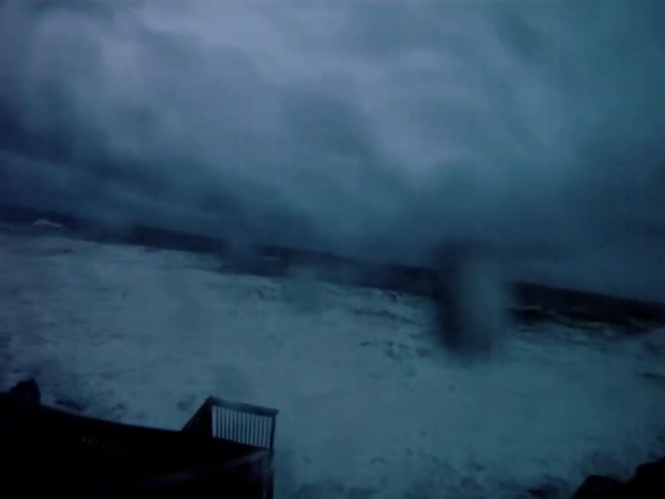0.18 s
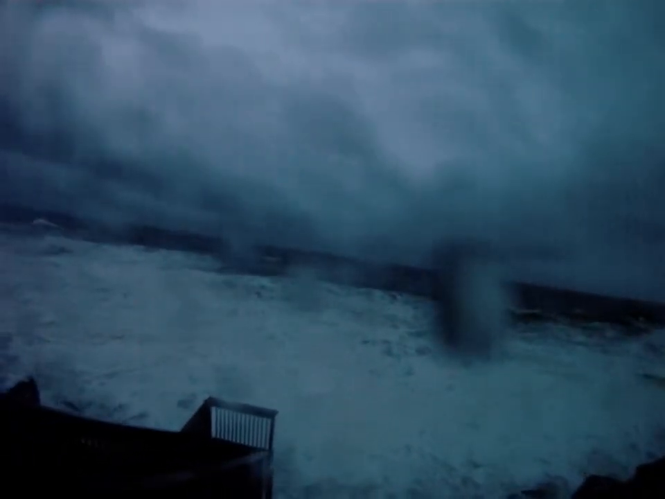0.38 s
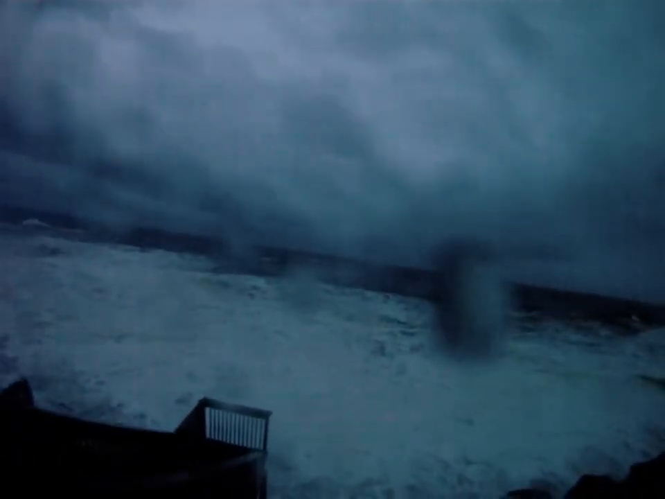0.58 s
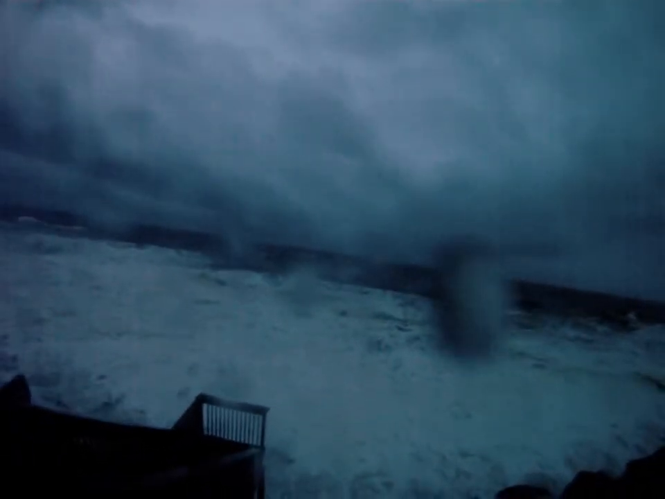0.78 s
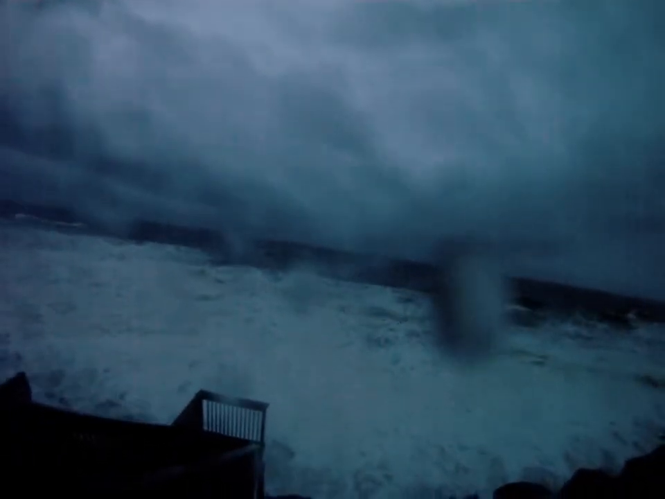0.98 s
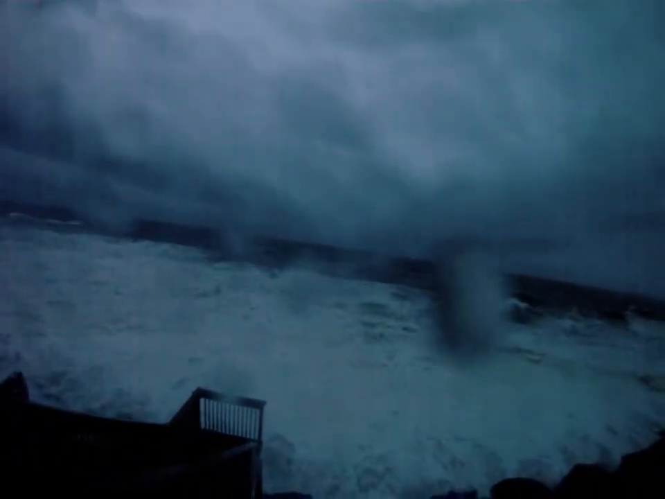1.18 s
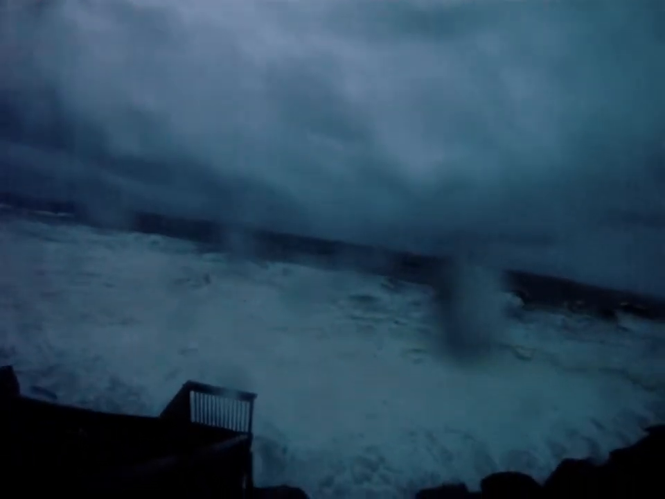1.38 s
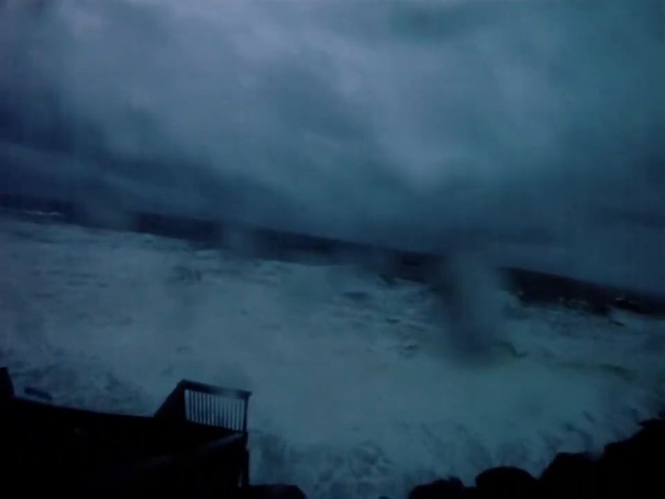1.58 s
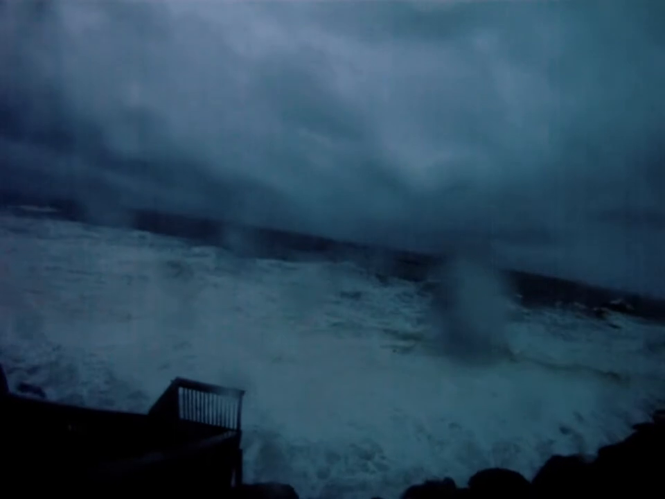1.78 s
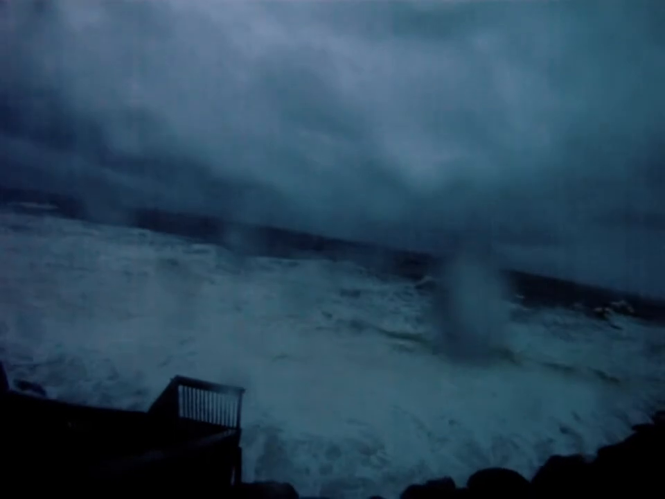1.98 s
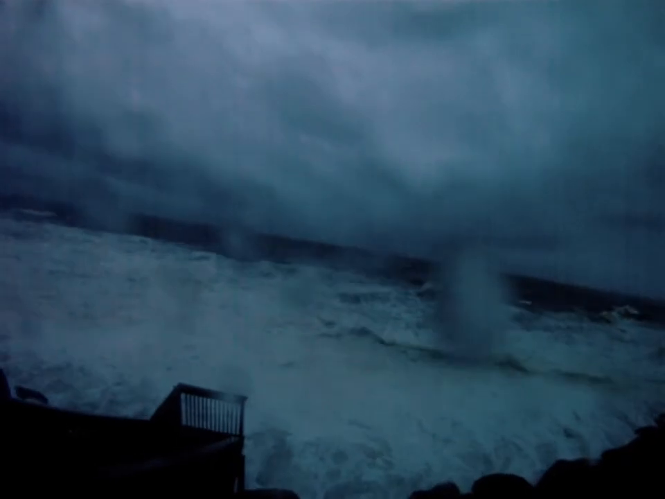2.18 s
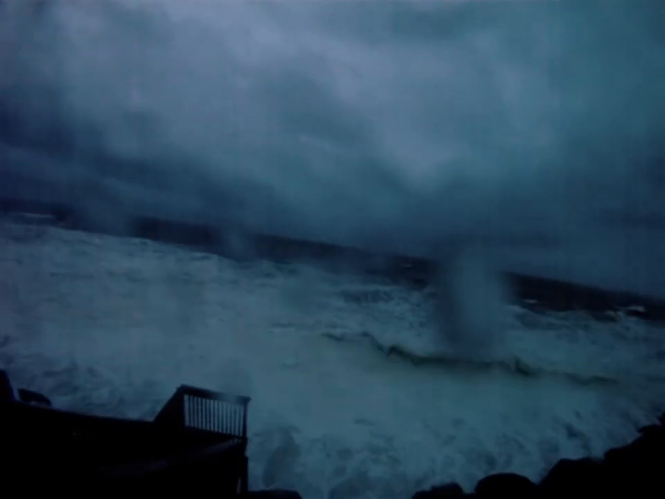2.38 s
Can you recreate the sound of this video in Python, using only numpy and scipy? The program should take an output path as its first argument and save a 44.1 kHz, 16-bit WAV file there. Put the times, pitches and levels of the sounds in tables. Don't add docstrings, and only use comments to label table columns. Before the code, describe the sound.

Storm surf roars without pause at a seawall, hollow and boxy through a sealed plastic housing. Hard drops tick early, then scattered lighter ones, while low wind rumble swells later; rough, dull mono sound.

```python
import sys
import numpy as np
from scipy import signal
from scipy.fft import rfft, irfft
from scipy.io import wavfile
from scipy.ndimage import uniform_filter1d, minimum_filter1d

SR = 44100
rng = np.random.default_rng(int(sys.argv[2]) if len(sys.argv) > 2 else 0)


def amplitude_ratio(level_db):
    exponent = np.asarray(level_db, float) / 20
    return 10 ** exponent


def output_pcm(signal):
    pcm = np.clip(np.atleast_2d(signal).T, -1, 1) * 32767
    wavfile.write(sys.argv[1], SR, np.round(pcm).astype(np.int16))


N = 105840

# [start_s, roar_db, gust_db]
STORM_LEVELS = [(0.0, -47.5, -47), (0.16, -46, -43), (0.52, -44.5, -42.5), (0.56, -45.5, -50),
                (0.62, -45.5, -43.5), (0.66, -47, -47.5), (0.88, -49, -49.5), (0.95, -47.5, -45.5),
                (1.28, -46.5, -44.5), (1.45, -41, -38), (1.52, -45, -45), (1.64, -38.5, -34),
                (1.78, -42, -45), (1.83, -40, -37), (1.87, -43, -41.5), (2.21, -42.5, -45),
                (2.37, -43, -37.5), (2.4, -46, -43)]
# [pitch_hz, level_db per Hz]
ROAR_SPECTRUM = [(150, -4.5), (400, -13), (800, -16), (1800, -15.5), (3100, -16.5), (4500, -15.5),
                 (5500, -20), (6000, -42.5)]
# [pitch_hz, width_hz, lift_db]
AIR_RESONANCES = [(1251, 470, 8), (2110, 420, 7.5), (2615, 440, 8.5), (3653, 210, 11), (5240, 1200, 1)]
# [start_s, cavity_db, wall_db, lid_db, shell_db]
BLOWN_DROPS = [(0.2179, -10, -20.5, -11, -16.5), (0.2461, -4, -4.5, -37, -23),
               (0.6958, -19, -26.5, -35, -34.5), (0.9147, -23, -54, -20.5, -21.5),
               (1.2148, -18, -22.5, -22.5, -21), (1.3784, -21, -35, -23, -29),
               (1.3817, -39, -28.5, -28, -24), (1.5799, -25, -56, -31, -51),
               (1.6085, -12.5, -24, -41, -34.5), (1.9658, -23, -52, -23.5, -29.5),
               (2.1144, -16.5, -23.5, -19, -20), (2.1779, -35, -56, -33, -31.5),
               (2.2871, -25, -57, -26, -31.5), (2.292, -41, -57, -23, -34),
               (0.0024, -33, -45, -30, -37.5), (0.0407, -35, -59, -46, -67), (0.342, -49, -40, -34, -39),
                (0.4353, -48, -37, -32.5, -37), (0.5873, -28.5, -38, -34, -41.5),
                (0.6744, -36, -45, -38, -44), (0.951, -38, -38, -44, -41.5), (1.1123, -31.5, -34, -50, -60),
                (1.2357, -37, -72, -50, -57), (1.3204, -36, -32.5, -40, -58),
                (1.3865, -52, -48, -51, -33.5), (1.3914, -43, -49, -50, -41), (1.6155, -34, -55, -43, -37),
                (1.674, -38, -29.5, -28.5, -33), (1.7737, -35, -53, -47, -39),
                (1.7818, -30.5, -49, -45, -40.5), (1.8755, -39, -33.5, -37, -44.5),
                (1.946, -27, -36, -33, -38.5), (2.2542, -50, -46, -38, -34.5)]
RING_PARTS = [0, 0, 1, 1, 2, 3, 3, 4, 5, 5]
# [pitch_hz, level_db, fade_s to fall 60 dB]
HOUSING_RINGS = [
    (2261, 25, 0.0066),
    (1910, -31, .006),
    (1240, 29, 0.0082),
    (1470, -13, .007),
    (2697, 0, 0.0057),
    (3692, 7, 0.005),
    (4700, -3.5, 0.0098),
    (5110, 0, 0.0041),
    (616, -3, 0.0051),
    (297, -7, 0.0062),
]
PART_LEVELS = [4, -1, 6.5, 8.5]
# [pitch_hz, level_db per Hz]
WIND_SPECTRUM = [(8.8, -26), (15, -4.5), (43, 0.5), (93, -0.5), (140, -7.5), (174, -10), (237, -13.5),
                 (500, -26), (650, -39), (1100, -120)]
# [start_s, cut_db relative to the treble]
TREBLE_CUT = [(0, -14), (.07, -3), (.18, -4), (.27, -13), (.44, -2), (.53, 0), (.64, -16), (1.0, -11),
              (1.11, -3), (1.25, -12), (1.48, -6), (1.62, -22), (1.82, -8), (1.97, -22), (2.27, -20),
              (2.36, -4)]


def evened(x):
    return x / np.sqrt(np.mean(x ** 2) + 1e-20)


def read(points, hz):
    f, value = np.transpose(points)
    return np.interp(np.log(hz + 1), np.log(f + 1), value)


def control(column):
    rows = np.array(STORM_LEVELS)
    return amplitude_ratio(np.interp(np.arange(N) / SR, rows[:, 0], rows[:, column]))


def filtered(x, order, hz, kind="low"):
    return signal.sosfilt(signal.butter(order, hz, kind, fs=SR, output="sos"), x)


def noise(shape_db, size, patchy_db, flicker_db):
    frames = 4 * N // size + 5
    hz = np.fft.rfftfreq(size, 1 / SR)
    a, b, patches = rng.standard_normal((frames, len(hz), 3)).T
    patches = uniform_filter1d(patches, size=6, axis=0)
    patches = evened(uniform_filter1d(patches, size=10, axis=1))
    flicker = evened(uniform_filter1d(rng.standard_normal(frames), size=3))
    level_db = shape_db(hz)[:, None] + patchy_db * patches + flicker_db * flicker
    z = (a + 1j * b) * amplitude_ratio(level_db)
    return evened(signal.istft(z, nperseg=size, noverlap=3 * size // 4)[1][:N])


def housing_db(hz):
    lifts = [lift_db / (1 + (2 * (hz - f) / width) ** 2) for f, width, lift_db in AIR_RESONANCES]
    return read(ROAR_SPECTRUM, hz) + sum(lifts)


def surf():
    roar = noise(housing_db, size=512, patchy_db=1.5, flicker_db=1.7)
    level = control(column=1)
    fizz = signal.sosfiltfilt(signal.butter(2, 3000, "high", fs=SR, output="sos"), roar)
    body = roar - fizz
    fizz_swing = (level / amplitude_ratio(-45.5)) ** 0.22
    return amplitude_ratio(1.5) * level * (body + fizz * fizz_swing)


def tick(levels_db):
    t = np.arange(1200) / SR
    splash_s, splash_db, detune = 0.0018, -26, 0.02
    splash = rng.standard_normal(len(t)) * np.exp(-t / splash_s)
    push = (t == 0) + amplitude_ratio(splash_db) * splash
    parts = np.zeros((6, len(t)))
    chances = rng.standard_normal((len(HOUSING_RINGS), 2))
    for part, (hz, db, fade_s), (shift, phase) in zip(RING_PARTS, HOUSING_RINGS, chances):
        swell = t / fade_s * amplitude_ratio(db - 100 * t / fade_s)
        mode = swell * np.sin(2 * np.pi * hz * (1 + detune * shift) * t + 0.4 * phase)
        parts[part] += signal.fftconvolve(push, mode)[:len(t)]
    stiff = filtered(parts[:5], 3, 1100, "high")
    soft = filtered(stiff[:2], 2, 3200)
    parts = np.vstack([soft, stiff[2:], parts[5:]])

    levels_db = np.add(levels_db, PART_LEVELS)
    wall_db, shell_db = levels_db[1], levels_db[3]
    snap_db = shell_db + min(-15.5 + 0.42 * (shell_db - wall_db), 0)
    thud_db = -1 + 1.8 * min(wall_db, 0)
    gains = amplitude_ratio(np.array([*levels_db, snap_db, thud_db]))
    return gains / abs(parts).max(1) @ parts


def drops():
    out = np.zeros(N + 1200)
    for start_s, *levels_db in BLOWN_DROPS:
        out[round(start_s * SR):][:1200] += tick(levels_db)
    return out[:N]


def spray():
    drops_per_s, spread_db, kinds = 270, -8, 12
    lands = rng.random(N) < drops_per_s / SR
    size = amplitude_ratio(spread_db * np.minimum(rng.exponential(1, N), 4)) * lands
    kind = rng.integers(0, kinds, N)
    patter = np.zeros(N)
    for k in range(kinds):
        sound = tick(4.0 * rng.standard_normal(4) - PART_LEVELS - 30)
        patter += signal.oaconvolve(size * (kind == k), sound)[:N]
    return amplitude_ratio(-26.5) * control(column=1) * evened(patter)


def wind_db(hz):
    return read(WIND_SPECTRUM, hz) - 30 * (hz > 600)


def wind():
    rumble = noise(wind_db, size=2048, patchy_db=0.67, flicker_db=-1.3)
    return amplitude_ratio(1.67) * control(column=2) * rumble


def scene():
    return np.tile(surf() + drops() + spray() + wind(), (2, 1))


def slow_sampling(x):
    sample_hz, guard_hz, edge_hz, mirror_db = 12000, 5980, 12070, 0.23
    x = filtered(x, 12, guard_hz)
    x = x * (1 + 2 * amplitude_ratio(mirror_db) * np.cos(2 * np.pi * sample_hz * np.arange(N) / SR))
    hz = np.fft.rfftfreq(N, 1 / SR)
    hold = np.sinc(hz / sample_hz)
    band_limit = amplitude_ratio(-74) + 1 / (1 + (hz / edge_hz) ** 70)
    return irfft(rfft(x) * hold * band_limit, N)


def roughen(x):
    hiss_db, smear_db = -14, -21.5
    hz, t, z = signal.stft(x, SR, nperseg=768)
    a, b, c, d = np.moveaxis(rng.standard_normal(z.shape + (4,)), -1, 0)
    treble = abs(z[(hz > 4500) & (hz < 10000)]) ** 2
    treble_db = 10 * np.log10(np.median(treble, axis=0) + 1e-20)
    treble_db = uniform_filter1d(minimum_filter1d(treble_db, size=5), size=5)
    z = z + amplitude_ratio(treble_db + hiss_db) * (c + 1j * d) * (hz[:, None] < 11000)

    bands = (abs(z[:384]) ** 2).reshape(96, 4, -1).mean(1)
    bands = np.repeat(bands, 4, axis=0)
    bands = np.vstack([bands, bands[-1:]])
    steady_db = 10 * np.log10(uniform_filter1d(bands, size=3, axis=1) + 1e-20)
    waver_db = 2.5 * evened(uniform_filter1d(rng.standard_normal(len(t)), size=3))
    cut_db = treble_db + np.interp(t, *np.transpose(TREBLE_CUT)) + waver_db
    lean_db = 5 * ((hz > 5950) & (hz < 7100)) + 2.5
    keep = (steady_db > cut_db + lean_db[:, None]) | (hz[:, None] < 4800)
    smear = amplitude_ratio(smear_db) * np.sqrt(bands) * (a + 1j * b)
    return signal.istft(keep * (z + smear), SR, nperseg=768)[1][:N]


def low_pass(x):
    return signal.sosfilt(signal.butter(12, 11250, fs=SR, output="sos"), x)


def record(dry):
    x = roughen(slow_sampling(dry[0]))
    side = amplitude_ratio(-52) * np.roll(x, 300)
    x = x + np.array([[1], [-1]]) * side
    return low_pass(np.clip(x, -1, 1))


dry = scene()
out = record(dry)
output_pcm(out)
```